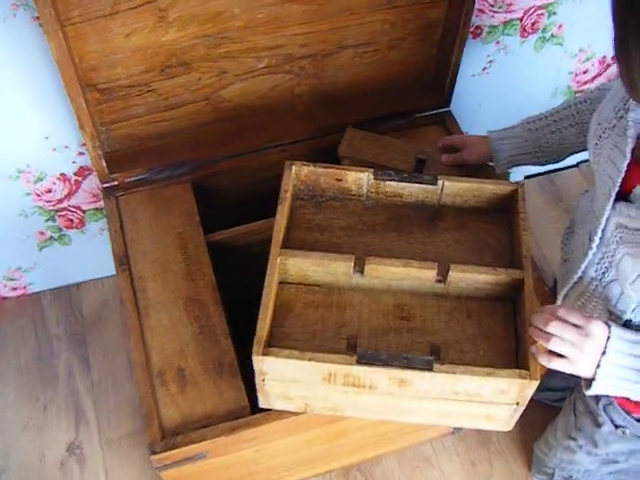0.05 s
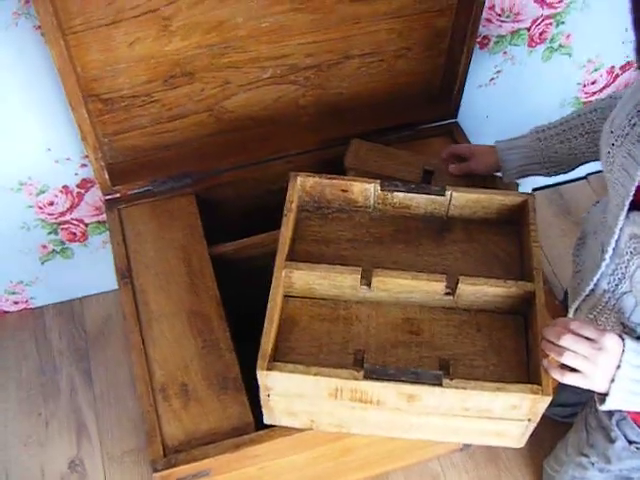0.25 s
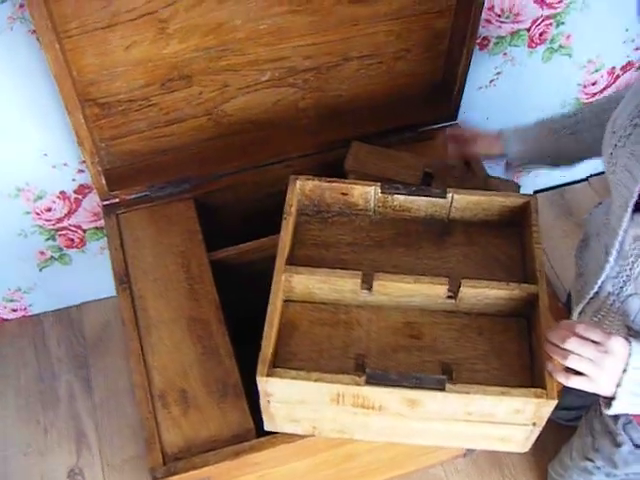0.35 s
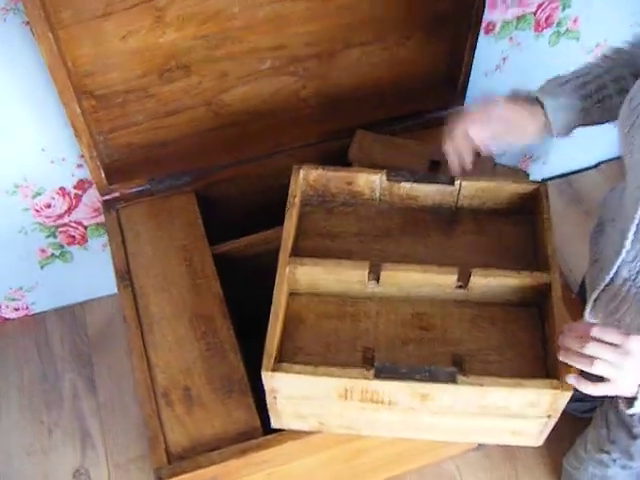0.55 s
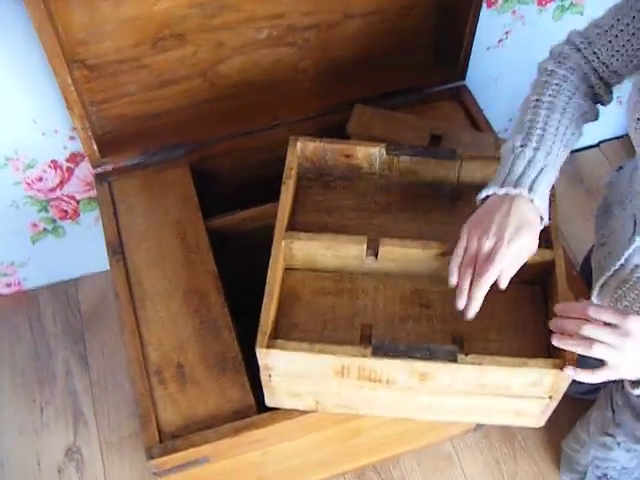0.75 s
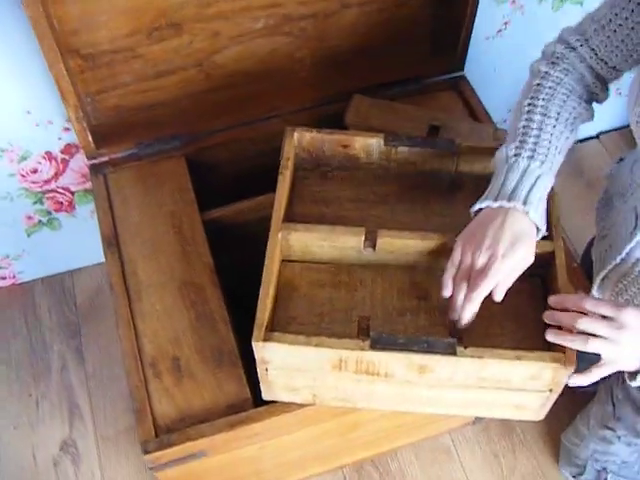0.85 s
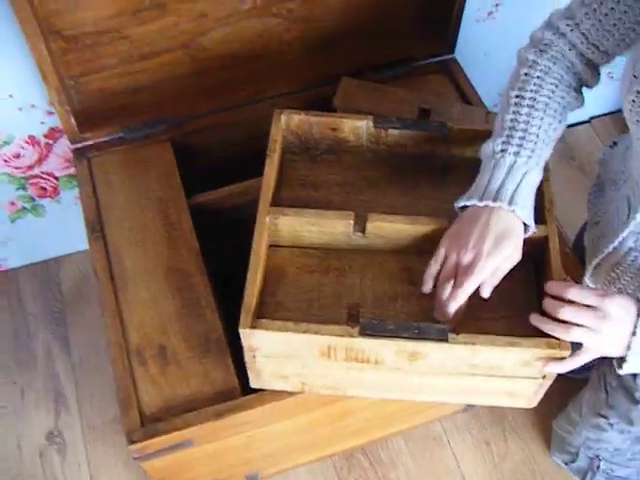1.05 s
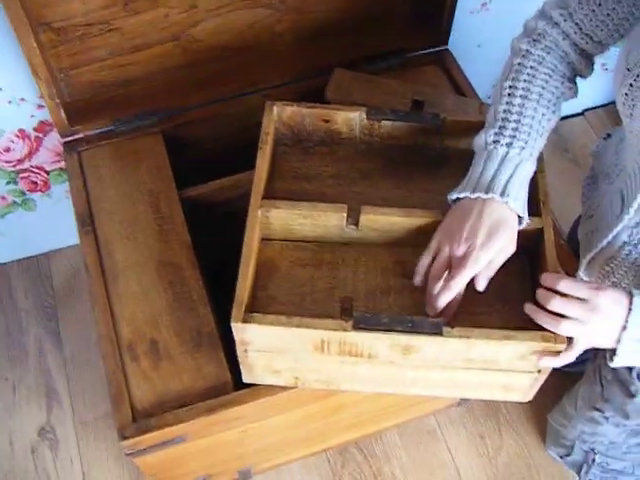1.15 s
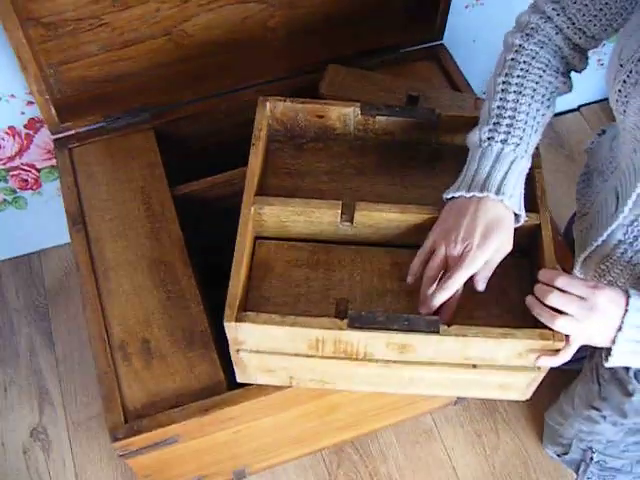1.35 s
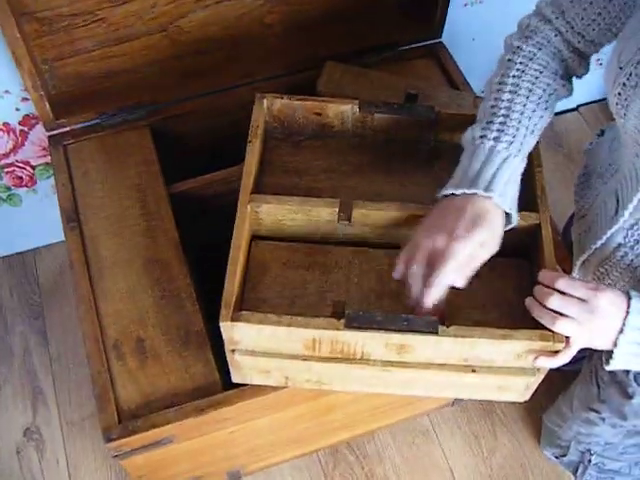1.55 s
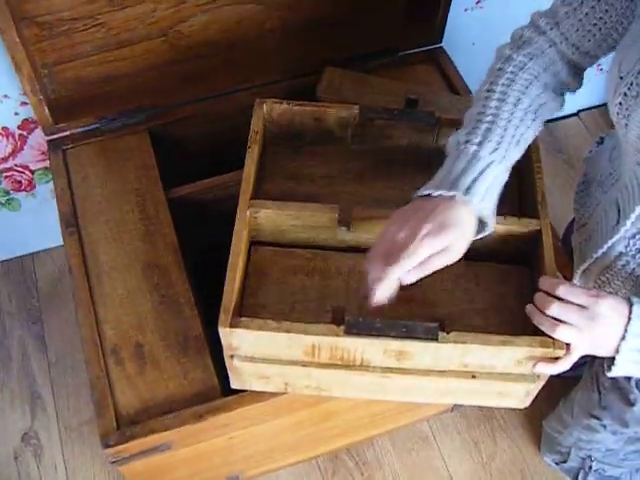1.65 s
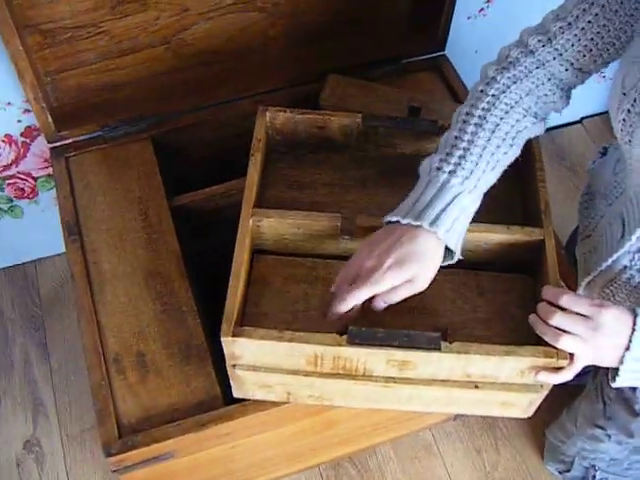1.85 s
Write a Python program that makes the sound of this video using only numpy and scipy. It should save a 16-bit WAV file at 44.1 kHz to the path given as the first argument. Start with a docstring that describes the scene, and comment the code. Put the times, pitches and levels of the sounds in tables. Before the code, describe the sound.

Wooden knocks: a small lid clatters down and slides, then two hollow finger taps on wood.

```python
"""Wooden lid and tray taps

A small wooden lid is put down inside a wooden chest: it knocks, rattles to rest and slides a little.
Then a fingertip taps twice on the thin bottom of a wooden tray, booming the hollow underneath,
and brushes along it with a faint squeak. A small room answers every blow, over a soft rush of noise."""
import sys
import numpy as np
from scipy import signal
from scipy.fft import rfft, irfft, next_fast_len
from scipy.io import wavfile
from scipy.ndimage import uniform_filter1d, minimum_filter1d, map_coordinates

SR = 44100
rng = np.random.default_rng(int(sys.argv[2]) if len(sys.argv) > 2 else 0)


def file_out(sig):
    """Save sig as 16-bit WAV at sys.argv[1]."""
    # one column per channel
    cols = np.atleast_2d(sig).T
    # limit, then scale
    lim = np.clip(cols, -1, 1)
    pcm = np.round(lim * 32767).astype(np.int16)
    wavfile.write(sys.argv[1], SR, pcm)


N = 83790


def amp(db):
    return 10 ** (np.asarray(db) / 20)


def unit(x):
    return x / np.sqrt(np.mean(x ** 2) + 1e-20)


def along(points, hz):
    """Read a curve of (Hz, value) points on a log frequency axis."""
    freqs, values = np.transpose(points)
    return np.interp(np.log(hz + 1), np.log(freqs + 1), values)


def fade(t, t60):
    """Exponential decay, 60 dB in t60 seconds."""
    return np.exp(-np.log(1000) * t / t60)


def swell(t, rise_s):
    """A smooth attack, as when force builds up during a contact."""
    return 1 - np.exp(-(t / rise_s) ** 2)


def noise(colour):
    """Noise of rms 1, shaped by a curve of (Hz, dB) points."""
    size = next_fast_len(N + 8192)
    gain = amp(along(colour, np.fft.rfftfreq(size, 1 / SR)))
    return unit(irfft(rfft(rng.standard_normal(size)) * gain, size)[:N])


def burst(colour, t, t60):
    """Dense, quickly damped modes: a noise burst whose energy is set by its decay."""
    envelope = fade(t, t60)
    x = noise(colour)[:len(t)] * envelope
    return x * np.linalg.norm(envelope) / np.linalg.norm(x)


def ring(modes, t, contact_s, scatter_db):
    """Struck modes: damped sines, randomly varied in level, that rise over the contact time."""
    x = sum(amp(db + scatter_db * rng.standard_normal()) * fade(t, t60) * np.sin(2 * np.pi * hz * t)
            for hz, db, t60 in modes)
    return x * swell(t, contact_s)


def add(out, start_s, x):
    """Mix x into out at start_s."""
    part = out[round(start_s * SR):][:len(x)]
    part += x[:len(part)]


def background():
    """A soft rush, strongest in the mids, that sinks toward the end."""
    # Tone of the rush. Each row: frequency in Hz, relative level in dB.
    colour = [(60, -28.5), (110, -19.5), (170, -23.5), (224, -8.5), (274, -15.5), (353, -8), (395, -15.5),
              (453, -5.5), (620, -8.5), (770, -4), (1050, -2.5), (1360, -11), (1700, -12), (2240, -21),
              (4870, -27), (5840, -29)]
    # Its fader curve. Each row: time in seconds, level in dB.
    levels = [(0, -38.5), (.65, -40), (1.3, -40), (1.7, -41), (1.9, -45.5)]
    return noise(colour) * amp(np.interp(np.arange(N) / SR, *np.transpose(levels)))


def room(x, wet_db):
    """A blow plus its diffuse small-room tail, each frequency dying at its own speed."""
    # Reverb decay. Each row: frequency in Hz, t60 in seconds.
    decay = [(130, .35), (400, 0.53), (900, 0.41), (2500, 0.29), (5500, 0.28)]
    predelay_s, build_s = 0.006, 0.009
    hz, t, spectrum = signal.stft(rng.standard_normal(len(x)), SR, nperseg=256)
    tail = signal.istft(spectrum * fade(t, along(decay, hz)[:, None]), SR, nperseg=256)[1]
    tail *= np.clip((np.arange(len(tail)) / SR - predelay_s) / build_s, 0, 1)
    return x + amp(wet_db) * signal.fftconvolve(x, tail / np.linalg.norm(tail))[:len(x)]


def friction(strokes, colour, grain_db=2.5, grains_per_s=200):
    """Grainy rubbing; each stroke swells 20 dB per rise time and fades 20 dB per fall time."""
    t = np.arange(N) / SR
    pressure = sum(amp(db - 20 * np.maximum((peak_s - t) / rise, (t - peak_s) / fall))
                   for peak_s, rise, fall, db in strokes)
    grain = map_coordinates(rng.standard_normal(N), [t * grains_per_s], order=1)
    return pressure * unit(noise(colour) * amp(grain_db * grain))


def finger_brush():
    """Skin dragged over the tray: a soft rub and a faint, narrow-band squeak."""
    # Finger strokes. Each row: peak time, rise and fall in seconds, level in dB.
    rub_strokes = [(1.378, 0.044, 0.049, -32.5), (1.549, 0.038, 0.036, -36), (1.692, 0.09, 0.34, -44.5),
                   (1.79, 0.27, 0.9, -49)]
    squeak_strokes = [(1.715, .08, .4, -53.5)]
    # Tone of the rub and of the squeak. Each row: frequency in Hz, relative level in dB.
    rub_colour = [(150, -2.5), (700, 7), (1300, 1), (2300, -6), (2750, -2.5), (2950, -3), (3200, -7),
                  (4400, -7.5), (6000, -17)]
    squeak_colour = [(2500, -62), (2880, -21), (2970, 0), (3060, -22.5), (3500, -57)]
    return friction(rub_strokes, rub_colour) + friction(squeak_strokes, squeak_colour)


def lid_slide():
    """Wood scrapes on wood as the settled lid slides a little."""
    # Two short slips. Each row: peak time, rise and fall in seconds, level in dB.
    strokes = [(.365, 0.138, .08, -32.5), (.43, 0.086, 0.075, -29)]
    # Tone of the scrape. Each row: frequency in Hz, relative level in dB.
    colour = [(200, -19), (900, -9.5), (1900, -6), (2300, 1.5), (2850, 0), (3300, -9), (5000, -7.5),
              (6000, -11.5)]
    return friction(strokes, colour)


def tray_taps():
    """A fingertip strikes the tray bottom; the spot decides which modes speak, the finger damps them."""
    # The taps. Each row: start in seconds, ring, thud, boom and tick levels in dB,
    # contact time in seconds, share of the full ring length, spot on the tray from 0 to 1.
    taps = [(1.3772, -9, -18.5, -26, -34, 0.0034, 0.95, 0.1),
            (1.5507, -7.5, -14.5, -35.5, -28.5, 0.0012, 1, 0.77)]
    # Modes of the bottom. Each row: frequency in Hz, t60 in seconds, level in dB at spot 0 and spot 1.
    tray_modes = [(298.6, 0.25, -28, -25), (381.7, 0.26, -28, -19.5), (417.5, 0.13, -16.5, -13.5),
                  (617, .21, -12, -21), (628, 0.13, -27, -13.5), (758.5, 0.14, -10, -17.5),
                  (831.4, 0.036, 5, -4.5), (887, 0.025, 4.5, -1), (1047, 0.043, -6.5, 3),
                  (1103, .04, -14.5, -4)]
    # Tone of the thud, the nail tick and the air in the hollow under the tray.
    # Each row: frequency in Hz, relative level in dB.
    thud_colour = [(70, -37), (125, -19), (200, -10), (320, 2.5), (700, 1.5), (1100, 0), (1450, -8),
                   (2100, -12), (3000, -25.5), (6000, -51.5)]
    nail_colour = [(500, -28), (1500, -21), (3000, 4.5), (4200, 7), (5200, -5.5), (6000, -23)]
    hollow_colour = [(60, -46), (100, -16), (128, -2.5), (170, -4), (205, -9.5), (270, -2.5), (400, 1),
                     (560, -10), (1200, -65)]
    out, t = np.zeros(N), np.arange(SR * 2 // 3) / SR
    for start_s, ring_db, thud_db, boom_db, tick_db, contact_s, length, spot in taps:
        modes = [(hz, db0 + spot * (db1 - db0), length * t60) for hz, t60, db0, db1 in tray_modes]
        panel = amp(ring_db) * ring(modes, t, contact_s, scatter_db=1.5)
        thud = amp(thud_db) * burst(thud_colour, t, t60=0.029) * swell(t, contact_s)
        tick = amp(tick_db) * burst(nail_colour, t, t60=0.0065)
        boom = amp(boom_db) * burst(hollow_colour, t, t60=0.17) * swell(t, rise_s=0.013)
        add(out, start_s, room(panel, wet_db=-11) + room(thud + tick, wet_db=2) + boom)
    return out


def lid_rattle():
    """The lid lands on one edge and rattles flat; each contact rings, thuds and cracks."""
    # The contacts. Each row: start in seconds, then ring, thud and crack levels in dB.
    contacts = [(0.2093, -37.5, -38.5, -22), (0.2105, -19, -13, -6.5), (.2240, -29.5, -14, -25),
                (.2272, -25, -16.5, -31), (.2298, -23.5, -31.5, -15.5), (.2505, -29.5, -20, -34),
                (.2585, -22.5, -18, -27), (.2690, -19, -18.5, -25), (.2760, -22, -17, -27),
                (.2825, -25, -21, -24), (.2985, -31.5, -25.5, -28.5), (.3190, -30, -28.5, -32.5)]
    # Modes of the lid with the chest under it, and the short-lived ones of its hard edge.
    # Each row: frequency in Hz, level in dB, t60 in seconds.
    body_modes = [(208, -15.5, .13), (585, -15, 0.24), (657.3, -7.5, 0.19), (823, -5.5, 0.28),
                  (902, -2.5, 0.11), (1363, -11.5, 0.28), (1449, -11.5, 0.075), (1635, -13, 0.25),
                  (1782, -7, 0.15), (2201, -14, 0.12), (2789, -10, 0.32), (3095, -21, 0.19),
                  (3545, -17, 0.088), (3756, -12, 0.1)]
    edge_modes = [(1387, -6, 0.039), (1836, -10.5, 0.024), (2255, -9.5, 0.044), (3070, -0.5, 0.016),
                  (3627, 2, 0.015), (3886, -6, 0.014), (4245, -5.5, .016), (4930, -11, 0.013)]
    # Tone of the dull thud and the bright crack. Each row: frequency in Hz, relative level in dB.
    thud_colour = [(70, -27.5), (130, -21), (200, -17.5), (260, -14.5), (480, -2.5), (620, -1.5),
                   (850, 5.5), (1100, -8.5), (1800, 0.5), (3000, -16.5), (6000, -48.5)]
    crack_colour = [(200, -35.5), (800, -14), (1400, -3.5), (2400, -5.5), (3000, 11.5), (3600, 2.5),
                    (4400, -2), (5050, -3.5), (5600, -22), (6000, -32)]
    hard_contact_s = 0.00056
    out, t = np.zeros(N), np.arange(SR * 2 // 3) / SR
    for start_s, ring_db, thud_db, crack_db in contacts:
        edge = amp(crack_db) * ring(edge_modes, t, hard_contact_s, scatter_db=3.5)
        crack = amp(crack_db + 1) * burst(crack_colour, t, t60=0.0096)
        thud = amp(thud_db) * burst(thud_colour, t, t60=0.036) * swell(t, hard_contact_s)
        body = amp(ring_db) * ring(body_modes, t, contact_s=0.0023, scatter_db=2.0)
        knock = room(thud + crack, wet_db=-5) + room(edge, wet_db=-14) + room(body, wet_db=-14)
        add(out, start_s, knock)
    return out


def limiter(x, ceiling_db, window_s):
    """Turn the gain down for a moment around each peak over the ceiling."""
    size = round(window_s * SR)
    needed = np.minimum(1, amp(ceiling_db) / (np.abs(x) + 1e-9))
    held = minimum_filter1d(needed, 2 * size)
    return x * uniform_filter1d(uniform_filter1d(held, size), size)


def scene():
    """Lid, taps and all rubbing over the background, in mono."""
    rubbing = lid_slide() + finger_brush()
    return (lid_rattle() + tray_taps() + rubbing + background())[None]


def record(dry):
    """The microphone loses deep bass and high treble, adds faint rumble, limits and just clips peaks."""
    low_cut_hz, high_cut_hz, top_hz = 140, 6000, 16200
    rumble_db, clip_db = -59, -4
    size = next_fast_len(N + SR // 2)
    hz = np.fft.rfftfreq(size, 1 / SR)
    x = signal.sosfilt(signal.butter(4, low_cut_hz, 'high', fs=SR, output='sos'), dry)
    treble_shelf = amp(along([(5100, 1.5), (5900, -11.5)], hz))
    high_cut = np.clip((high_cut_hz - hz) / 300 + .5, 0, 1)
    x = irfft(rfft(x, size) * treble_shelf * high_cut, size)[..., :N]
    x += amp(rumble_db) * noise([(10, 13.5), (30, -14), (80, -7.5), (150, -25.5), (400, -79.5)])
    x = limiter(x, ceiling_db=-3.5, window_s=0.001)
    x = np.clip(x, -amp(clip_db), amp(clip_db))
    return irfft(rfft(x, size) * (hz < top_hz), size)[..., :N]


dry = scene()
out = record(dry)
file_out(out)
```